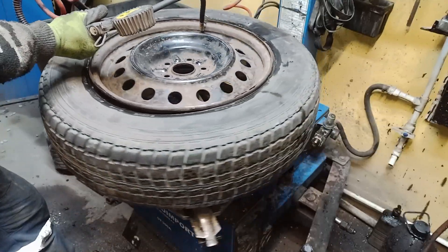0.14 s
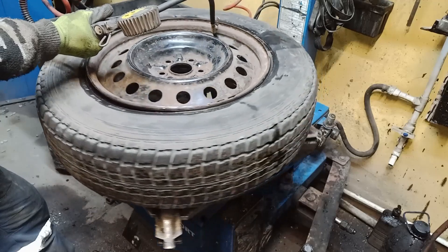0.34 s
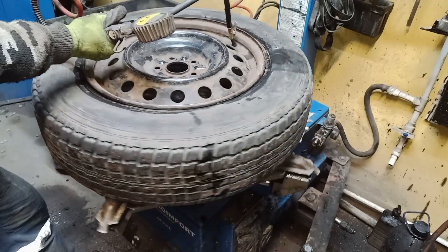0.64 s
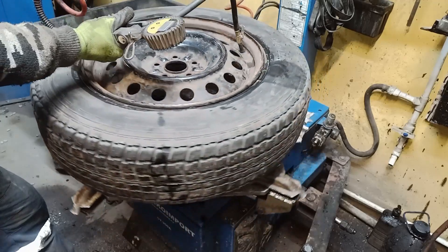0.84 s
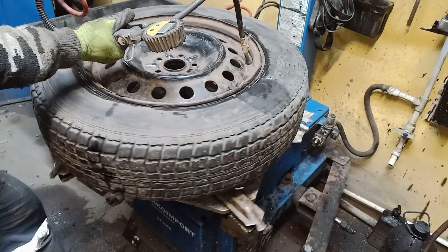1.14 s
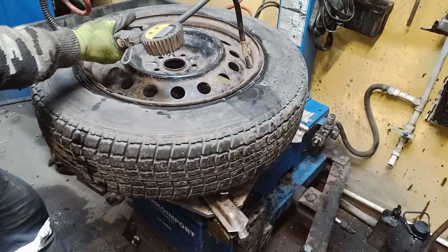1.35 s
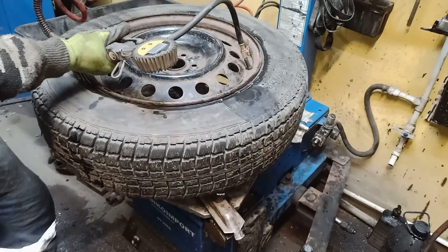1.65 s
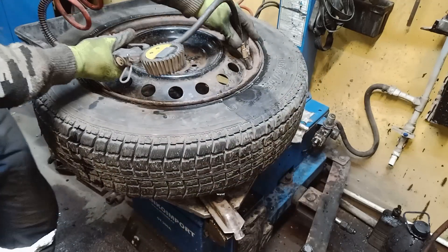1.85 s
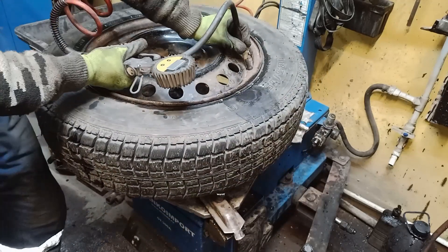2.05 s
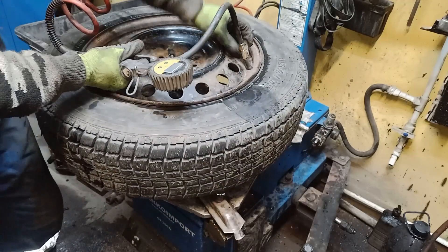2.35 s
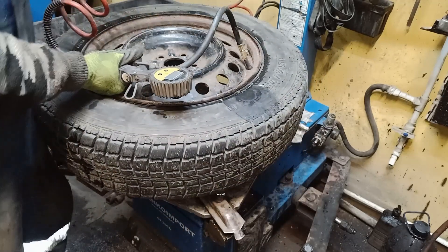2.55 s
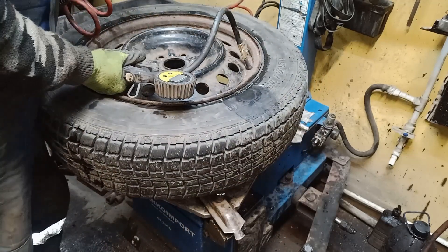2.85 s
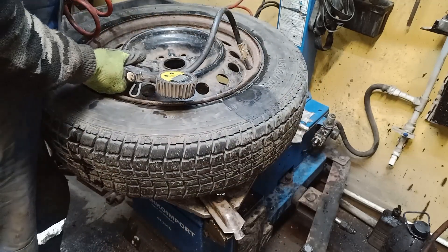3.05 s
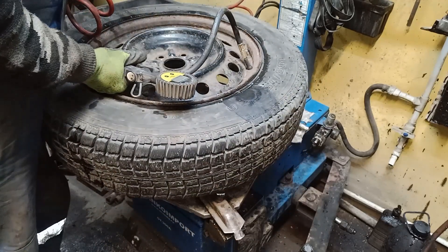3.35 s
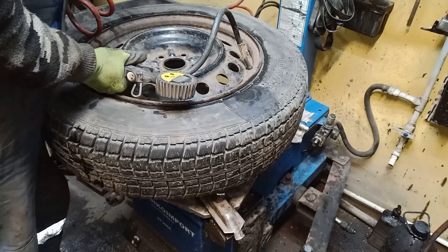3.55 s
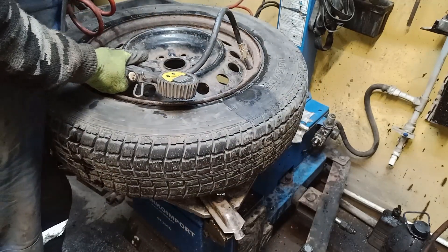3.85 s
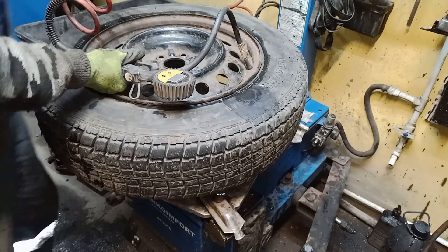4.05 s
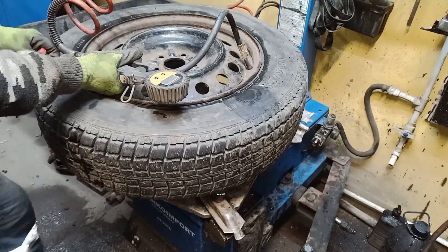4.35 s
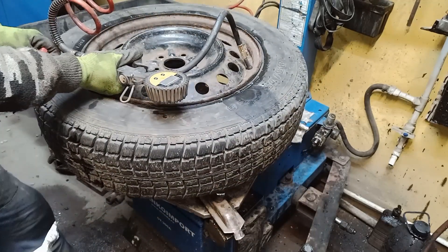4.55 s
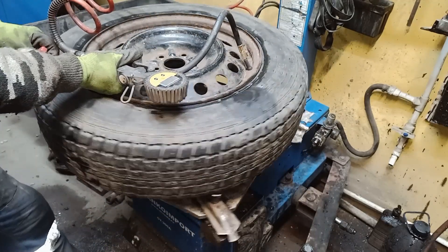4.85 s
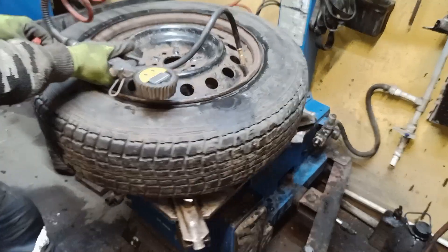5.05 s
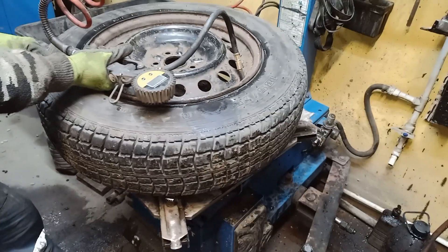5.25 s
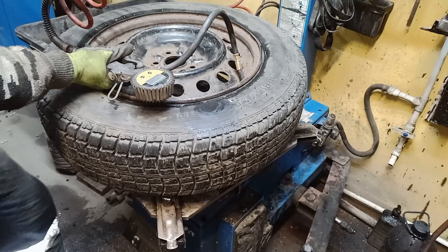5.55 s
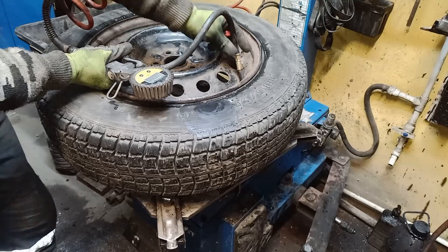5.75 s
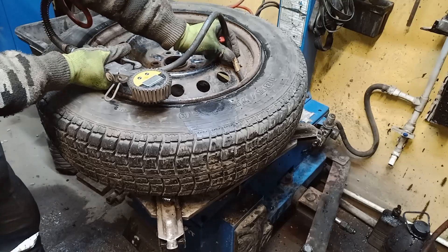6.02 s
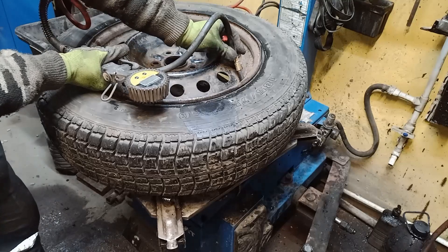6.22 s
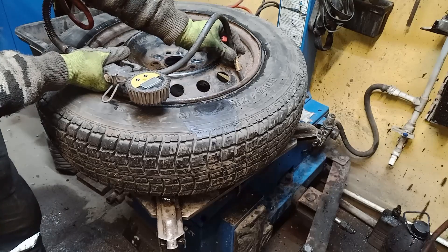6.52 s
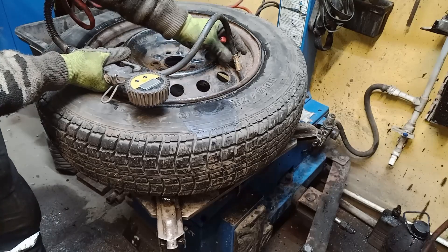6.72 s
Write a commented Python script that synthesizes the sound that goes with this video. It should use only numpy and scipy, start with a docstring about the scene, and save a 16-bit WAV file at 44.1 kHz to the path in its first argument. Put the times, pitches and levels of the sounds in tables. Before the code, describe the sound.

A bright hiss of compressed air filling a tyre and leaking at its edge is heard from the start, with a faint wavering whistle, over the low hum of a tyre changer's motor. The motor stops with a soft clack at about 1.2 seconds. At 1.9 seconds the tyre snaps over the steel rim with a loud, juddering bang, the loudest sound, leaving a short low ring and a brief garage echo. The leak stops and a softer, steady hiss of filling continues to the end. Gloves, sleeve and hose scuff faintly around 2.3 seconds and between 4 and 4.7. Near 4.9 seconds a pedal switch clacks sharply, the motor hums for a moment and stops with a lighter clack. A weaker leak hisses from about 5.1 to 6 seconds, with a couple more scuffs, followed by a faint whistle.

```python
"""First comes a hiss of air over a humming motor: a tyre is being inflated on a tyre changer in a garage.
Air rushes through the valve and rings inside the tyre, while a brighter leak hisses until the bead (the
tyre's edge) slips over the rim with a bang. The turntable motor stops before the bang and is later run
once more, briefly, by its clacking pedal switch. Gloves, sleeve and hose scuff now and then."""
import sys
import numpy as np
from scipy import signal
from scipy.fft import rfft, irfft
from scipy.io import wavfile
from scipy.ndimage import uniform_filter1d

SR = 44100
rng = np.random.default_rng(int(sys.argv[2]) if len(sys.argv) > 2 else 0)


def waveform_to_disk(signal):
    """Save audio, clipped to [-1, 1], as 16-bit WAV at the path in sys.argv[1]."""
    frames = np.transpose(np.atleast_2d(signal))
    scaled = np.clip(frames, -1, 1) * 32767
    samples = np.round(scaled).astype(np.int16)
    wavfile.write(sys.argv[1], SR, samples)


N = 303403
T = np.arange(N) / SR
FREQ = np.arange(N // 2 + 1) * SR / N + 1e-3


def undb(db):
    """Turn decibels into a gain."""
    return 10 ** (np.asarray(db) / 20)


def unit(x):
    """Scale a sound to an average (rms) level of 1."""
    return x / np.sqrt(np.mean(x ** 2))


def colour(points):
    """A gain for every frequency, drawn through (Hz, dB) points."""
    hz, db = np.transpose(points)
    return undb(np.interp(np.log(FREQ), np.log(hz), db))


def noise(gain):
    """Noise of level 1, shaped by a gain for every frequency."""
    return unit(irfft(rfft(rng.standard_normal(N)) * gain, N))


def walk(rate):
    """A smooth random wobble of size about 1, with `rate` new values a second."""
    hold = int(SR / rate)
    steps = np.repeat(rng.standard_normal(N // hold + 1), hold)
    return 1.3 * uniform_filter1d(uniform_filter1d(steps, hold), hold)[:N]


def fade(start, t60, rise=0.0017):
    """Loudness of a blow: a quick rise, then a fall of 60 dB in t60 seconds (the fade time)."""
    age = np.clip(T - start, 0, 4 * t60)
    return (1 - np.exp(-age / rise)) * np.exp(-np.log(1000) * age / t60)


def spell(start, stop, rise, t60):
    """Loudness of something switched on and off: it rises, holds, then fades."""
    return np.clip((T - start) / rise, 0, 1) * np.exp(-np.log(1000) * np.clip((T - stop) / t60, 0, 4))


def ring(x, response):
    """Let a sound set a room or an object ringing."""
    return signal.fftconvolve(x, response / np.sqrt(np.sum(response ** 2)))[:N]


def garage(x, echo_db=-9.5, low_t60=0.29, treble_t60=0.19):
    """Hard walls add a short wash of echo whose treble dies first."""
    low = 1 / (1 + (FREQ / 2500) ** 2)
    white = rfft(rng.standard_normal(N))
    low_tail = irfft(white * low, N) * fade(0.002, low_t60, rise=0.0087)
    treble_tail = irfft(white * (1 - low), N) * fade(0.00616, treble_t60, rise=0.0094)
    return x + undb(echo_db) * ring(x, (low_tail + treble_tail)[:SR])


# Tone of a dry rustle, and of a dull rub or knock. Each row: frequency in Hz, level in dB.
RUSTLE_COLOUR = [(600, -24), (1500, -4.5), (3000, -3), (5300, 8), (6800, 0.5), (8500, -21), (14000, -31.5)]
DULL_COLOUR = [(40, -10), (150, 5), (400, -1.5), (750, -2.5), (1200, -7.5), (2000, -14.5), (4000, -39)]
# The strokes. Each row: middle in seconds, rough length in seconds, rustle in dB, rub in dB.
SCUFFS = [(2.297, 0.046, -43, -54), (4.055, 0.022, -43.5, -73), (4.163, 0.085, -50, -64.5),
          (4.388, 0.046, -48, -71), (4.705, 0.052, -68, -55), (5.676, 0.022, -47, -58),
          (5.798, 0.067, -40, -57.5)]

def scuffs(grain_db=2.0):
    """Cloth and rubber slide in short, grainy strokes."""
    rustle, rub = noise(colour(RUSTLE_COLOUR)), noise(colour(DULL_COLOUR))
    strokes = sum(np.exp(-2 * ((T - middle) / length) ** 2) * (undb(dry_db) * rustle + undb(rub_db) * rub)
                  for middle, length, dry_db, rub_db in SCUFFS)
    return strokes * undb(grain_db * walk(220))


# Tones of the hum. Each row: multiple of the hum's pitch, relative level in dB.
HUM_TONES = [(1, 0), (2, -.5), (3, -12.5), (4, -27), (5, -32), (6, -25), (7, -25), (8, -20), (9, -30),
             (10, -30)]
# Tone of the gears and bearings. Each row: frequency in Hz, level in dB.
GEAR_COLOUR = [(30, -7), (60, 1), (110, 7.5), (230, 8.5), (450, -5.5), (680, 3), (1000, -4), (1800, -2.5),
               (3000, -19.5), (8000, -61)]
# When the motor runs. Each row: on and off in seconds.
MOTOR_RUNS = [(-.1, 1.178), (4.925, 5.09)]

def motor(hum_hz=100.05, level_db=-34.5, gears_db=-9.5, waver_db=1.42):
    """The motor's magnetic pull pulses at twice the mains rate; the gearbox rumbles along."""
    phase = 2 * np.pi * hum_hz * T + 0.04 * walk(12)
    hum = sum(-undb(db + waver_db * walk(10)) * np.cos(k * phase) for k, db in HUM_TONES)
    gears = undb(gears_db) * noise(colour(GEAR_COLOUR))
    running = sum(spell(on, off, rise=0.075, t60=0.15) for on, off in MOTOR_RUNS)
    return (unit(hum) + gears) * undb(level_db) * running


# Tone of the metal clack. Each row: frequency in Hz, level in dB.
CLACK_COLOUR = [(1500, -17.5), (3300, -14.5), (4400, -3.5), (5250, 4.5), (6500, -7.5), (8000, -24.5),
                (12500, -30.5), (15500, -13)]
# The switch snaps and the drive takes hold. Each row: start in seconds, level in dB,
# the metal's fade time in seconds, knock in dB compared with the metal.
CLACKS = [(1.174, -39.5, 0.17, 3), (4.9235, -18, 0.09, -12), (4.945, -36, 0.13, -2.5),
          (5.062, -32, 0.23, -5)]

def pedal_clacks(rise_s=0.0053):
    """The switch makes a bright metal clack over a longer, dull knock of the machine's frame."""
    metal, frame = noise(colour(CLACK_COLOUR)), noise(colour(DULL_COLOUR))
    out = 0
    for start, db, t60, knock_db in CLACKS:
        knock = undb(knock_db) * fade(start, 1.65 * t60, rise_s) * frame
        out += undb(db) * (fade(start, t60, rise_s) * metal + knock)
    return out


# When the jet sings. Each row: start and stop in seconds, level in dB.
SINGS = [(-.2, .04, -34.5), (0.277, 1.699, -42.5), (5.982, 6.43, -44.5)]
# Its wandering note. Each row: time in seconds, pitch in Hz.
SING_PITCH = [(0, 5560), (.25, 5400), (.48, 5000), (.7, 5300), (.9, 5080), (1.1, 5620), (1.5, 5500),
              (6.88, 5560)]

def singing_jet(width_hz=200):
    """Air sings faintly at the hose's nozzle; its breathy pitch wanders as the turntable turns."""
    phase = 2 * np.pi * np.cumsum(np.interp(T, *np.transpose(SING_PITCH))) / SR
    band = 1 / (1 + (FREQ / width_hz) ** 2)
    singing = sum(undb(db) * spell(start, stop, rise=0.18, t60=0.7) for start, stop, db in SINGS)
    return unit(noise(band) * np.cos(phase) + noise(band) * np.sin(phase)) * singing


def flutter(x, shared_db, own_db):
    """A jet is unsteady: all of it wavers together, and each frequency band also flickers alone."""
    spectrum = rfft(x)
    band = np.digitize(FREQ, [1400, 3500, 5000, 6200, 9000])
    flickering = sum(irfft(spectrum * (band == k), N) * undb(own_db * walk(35)) for k in np.unique(band))
    return flickering * undb(shared_db * walk(10))


# Tone of the leak. Each row: frequency in Hz, level in dB.
LEAK_COLOUR = [(290, -55), (500, -37), (578, -32.5), (760, -31), (1410, -17.5), (2030, -18), (2550, -11.5),
               (2740, -14.5), (5560, -1.5), (6610, -2), (8090, -19), (12100, -21), (13600, -20),
               (15000, -3.5), (15700, -0.5)]
# When the gap leaks. Each row: start and stop in seconds, level in dB, seconds taken to open,
# growth in dB per second.
LEAKS = [(-.1, 1.915, -30, .05, .6), (1.96, 2.035, -32.5, 0.063, 0), (5.115, 5.965, -39, .04, -2.5)]

def leak():
    """Air squeezes out through a narrow gap with a smooth, bright hiss."""
    gap = sum(spell(opens, shuts, rise, t60=0.087) * undb(db + growth * (T - opens))
              for opens, shuts, db, rise, growth in LEAKS)
    return flutter(noise(colour(LEAK_COLOUR)), shared_db=0.33, own_db=1.0) * gap


# Overall tone of the air in the tyre. Each row: frequency in Hz, level in dB.
FLOW_COLOUR = [(30, -18.5), (65, -26), (250, -17.5), (600, -18.5), (760, -32), (1230, -28), (1500, -18.5),
               (2600, -19.5), (3400, -15), (4350, -8.5), (4700, -1), (5500, -2.5), (6800, -11.5),
               (7600, -23), (13300, -44), (15700, -17)]
# Notes at which air rings in tyre and valve. Each row: pitch in Hz, rough width in Hz, level in dB.
AIR_NOTES = [(108, 25, -5), (180, 14, -2), (325, 22, -13), (397, 18, -14), (500, 10, -5), (575, 14, -7),
             (1080, 25, -23), (1455, 40, -11), (1610, 50, -13), (1720, 20, -8), (2024, 25, -8),
             (2150, 60, -14), (2405, 25, -12), (2740, 28, -11), (3105, 30, -11), (3235, 30, -11),
             (3645, 25, -4), (3850, 25, -3), (4052, 30, -1), (4455, 35, -2), (4595, 62, 8), (4861, 25, 2),
             (5075, 45, 2), (5430, 30, -1), (5690, 60, 1), (7208, 33, -10), (7795, 40, -14),
             (8340, 90, -21), (10300, 30, -17), (11015, 20, -19), (11650, 150, -33)]
# The flow eases as the tyre fills, then picks up a little. Each row: time in seconds, level in dB.
FLOW_LEVELS = [(0, -40), (1.1, -38), (2.3, -41.5), (3.5, -44), (4.8, -43), (5.3, -42), (6.88, -42.5)]

def filling(dip_db=-2.5, dip_at_s=2.196, dip_width_s=0.066):
    """The jet from the valve roars inside the tyre and makes the air ring at many notes."""
    # a crowd of weak notes lies between the strong ones
    grid_hz = np.arange(0, SR / 2, 35)
    crowd_db = np.interp(FREQ, grid_hz, 2.6 * rng.standard_normal(len(grid_hz)))
    power = (colour(FLOW_COLOUR) * undb(crowd_db * np.clip(FREQ / 1500, 0, 1))) ** 2
    for hz, width, db in AIR_NOTES:
        power += undb(db) ** 2 / (1 + ((FREQ - hz) / (0.54 * width)) ** 2) ** 2
    flow_db = np.interp(T, *np.transpose(FLOW_LEVELS))
    flow_db += dip_db * np.exp(-((T - dip_at_s) / dip_width_s) ** 2)  # a brief dip after the bang
    return flutter(noise(np.sqrt(power)), shared_db=0.57, own_db=0.04) * undb(flow_db)


# The bead snaps over the rim's hump, bounces, slips on and settles.
# Each row: start in seconds, level in dB.
BEAD_BLOWS = [(1.9144, -8.5), (1.934, -17), (1.953, -15), (2.040, -21.5)]

def bead_force(judder_at_s=1.95, jerk_gap_s=0.0132, jerk_db=-16.5, fall_db_per_s=160):
    """The bead hits the rim in a few blows, and sticks and slips in five ever weaker jerks."""
    delays = np.cumsum(jerk_gap_s * np.exp(0.14 * rng.standard_normal(5)))
    blows = [undb(db) * fade(start, t60=0.067) for start, db in BEAD_BLOWS]
    jerks = [undb(jerk_db - fall_db_per_s * (delay - delays[0])) * fade(judder_at_s + delay, t60=0.097)
             for delay in delays]
    return np.sqrt(sum(push ** 2 for push in blows + jerks))


def air_ring(hz=213, level_db=-29, hold_s=0.45):
    """The bang sets the air in the tyre ringing: a low note swells, fades, then dies quickly."""
    start = BEAD_BLOWS[0][0]
    note = fade(start, t60=1.05, rise=0.12) * np.sin(2 * np.pi * hz * T)
    return undb(level_db) * note * spell(start, start + hold_s, rise=1 / SR, t60=0.25)


# Tone of the rubber's slap and of its first crack. Each row: frequency in Hz, level in dB.
SLAP_COLOUR = [(59, -59), (100, -46), (154, -12.5), (264, -12.5), (318, -2.5), (368, -7), (416, -5),
               (491, -5), (895, -2), (1880, -19), (2910, -11.5), (4050, -21), (5300, -15), (8180, -41),
               (14000, -59.5)]
CRACK_COLOUR = [(500, -6), (2500, 4), (5500, -6.5), (8000, -11.5), (15000, -20)]
# Notes of the steel rim and tyre body. Each row: pitch in Hz, relative level in dB,
# nominal fade time in seconds.
WHEEL_NOTES = [(323, -1, 0.23), (420, -4, 0.38), (554, -5, 0.36), (673, 0, 0.23), (764, -4, 0.28),
               (888, -2, 0.31), (921, -12, 0.39), (985, -3, 0.27), (1044, -8, 0.32), (1174, -5, 0.26),
               (1238, -9, 0.29), (1292, -10, 0.28), (1427, -19, 0.36), (1707, -13, 0.27), (2353, -12, 0.28),
               (2573, -16, 0.35), (2767, -13, 0.27), (2998, -9, 0.28)]

def bead_bang(slap_db=-1, wheel_db=-10, crack_db=-21):
    """Rubber cracks over the hump and slaps the rim's edge, and the wheel rings."""
    force = bead_force()
    slaps = force * noise(colour(SLAP_COLOUR))
    crack = fade(BEAD_BLOWS[0][0], t60=0.012, rise=0.00038) * noise(colour(CRACK_COLOUR))
    # the wheel's notes ring briefly, for three quarters of their listed fade time
    wheel = sum(undb(db) * fade(0, 0.75 * t60) * np.sin(2 * np.pi * hz * T)
                for hz, db, t60 in WHEEL_NOTES)
    ringing = ring(force * rng.standard_normal(N), wheel[:SR])
    return undb(slap_db) * slaps + undb(crack_db) * crack + undb(wheel_db) * ringing


def scene():
    """Air, motor and echoing blows and scuffs, the same in both ears."""
    bang = bead_bang()
    air = filling() + leak() + singing_jet() + air_ring()
    mono = air + motor() + garage(bang + pedal_clacks() + scuffs())
    return np.array([mono, mono])


def record(dry, top_hz=15750):
    """The very highest treble is cut off steeply."""
    return signal.sosfiltfilt(signal.ellip(10, .1, 60, top_hz, fs=SR, output="sos"), dry)


dry = scene()
out = record(dry)
waveform_to_disk(out)
```